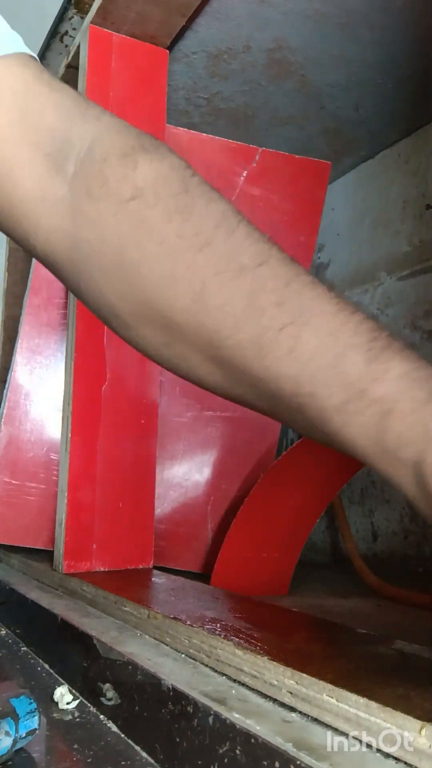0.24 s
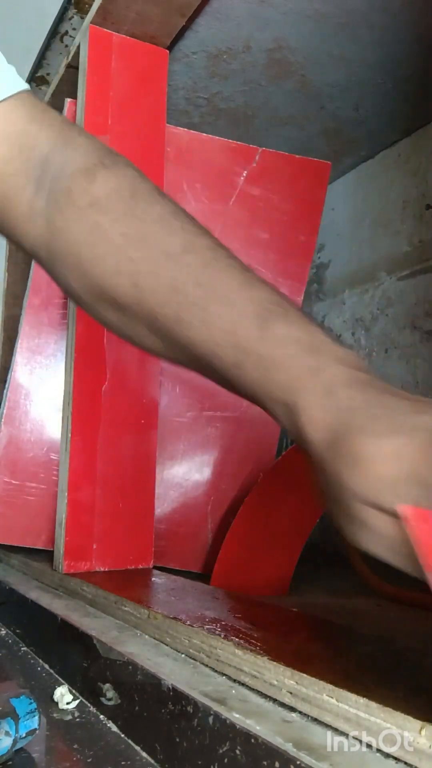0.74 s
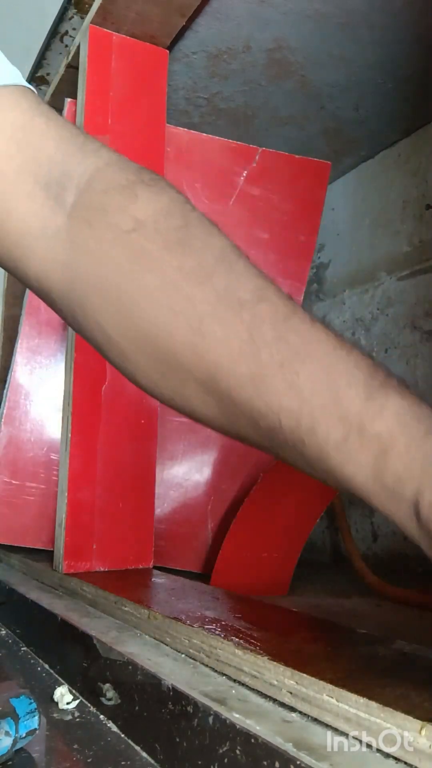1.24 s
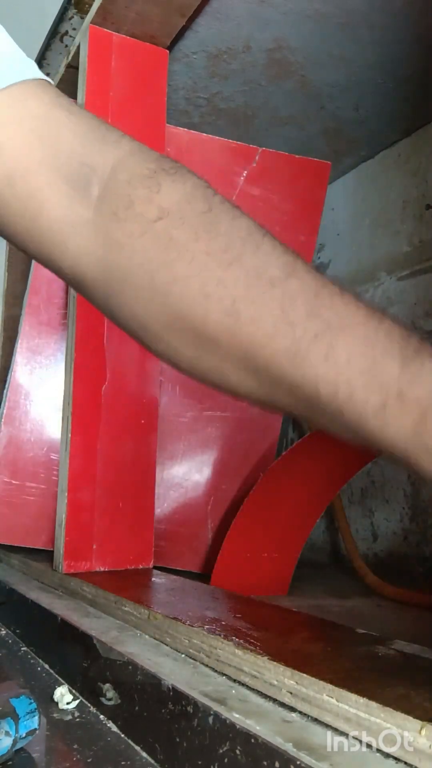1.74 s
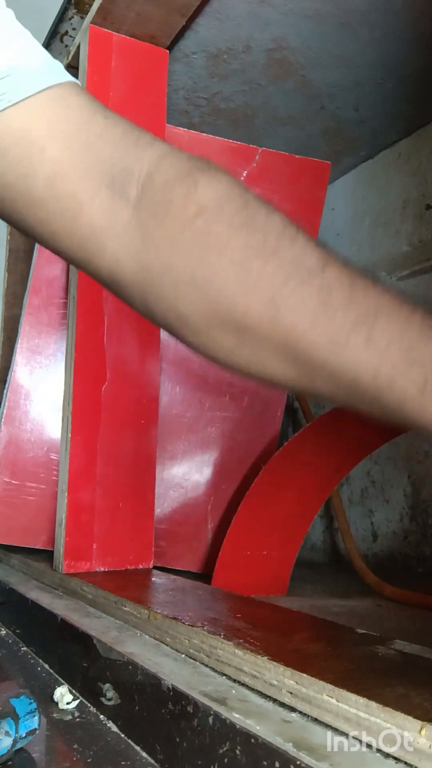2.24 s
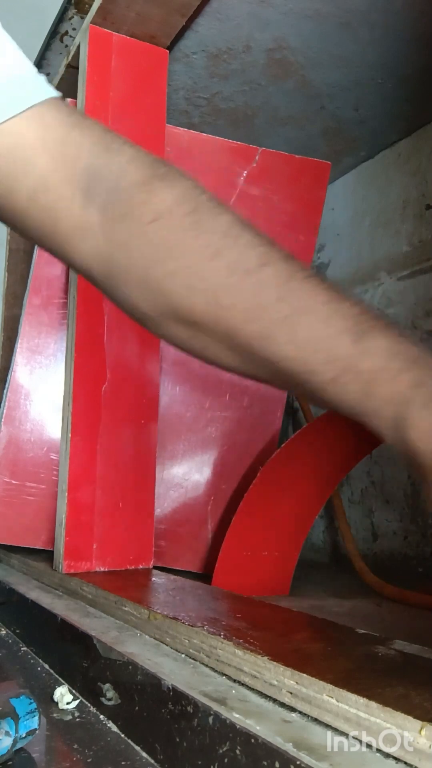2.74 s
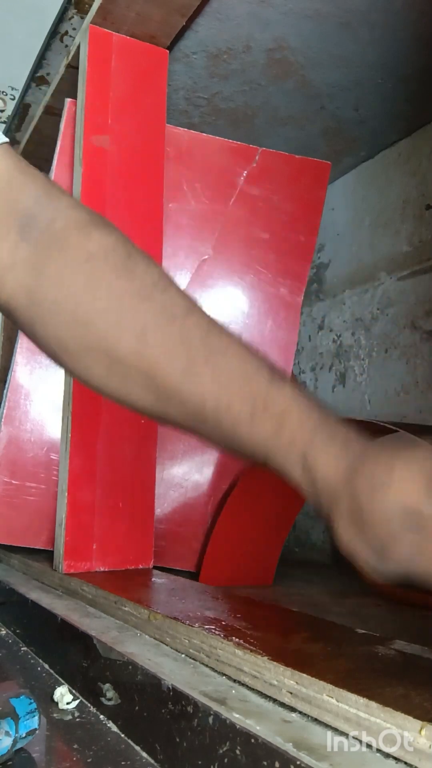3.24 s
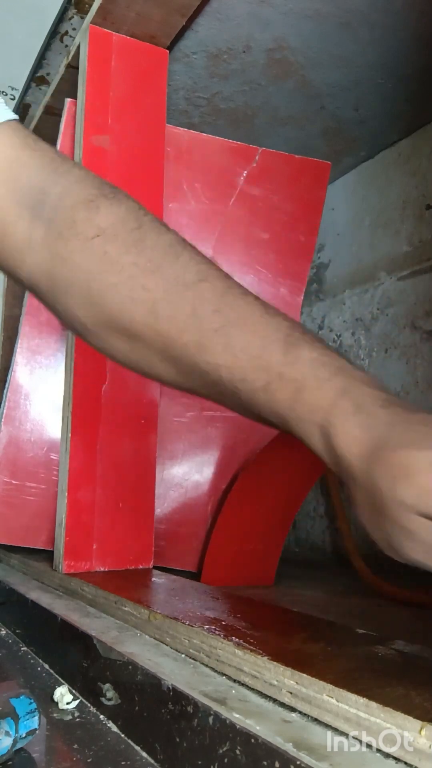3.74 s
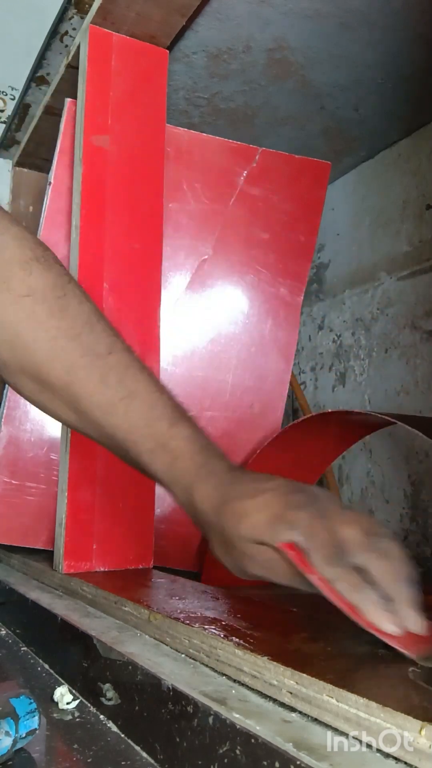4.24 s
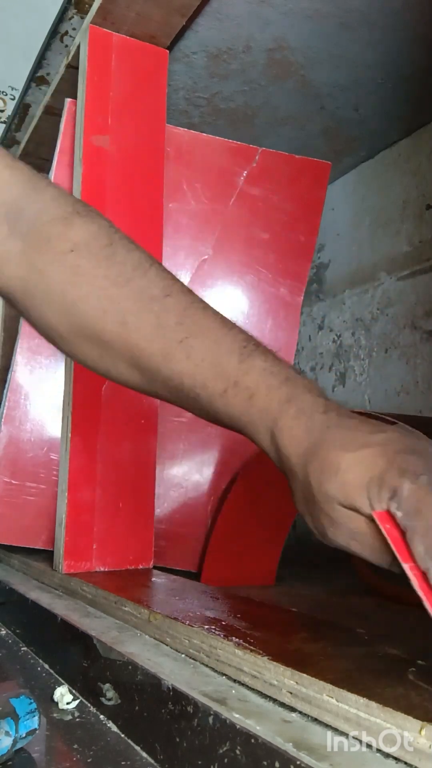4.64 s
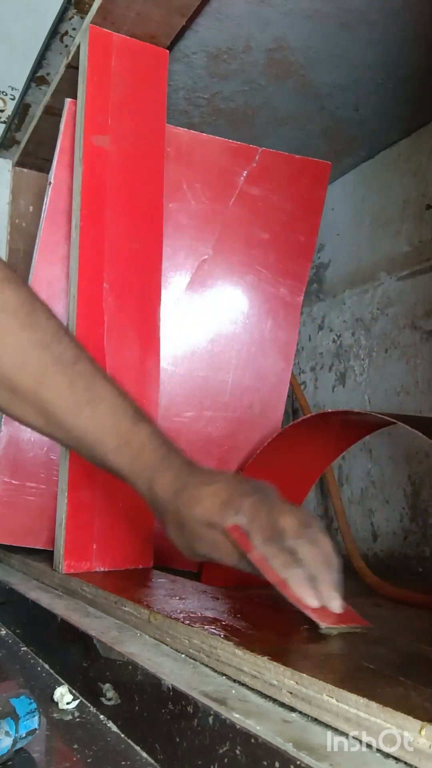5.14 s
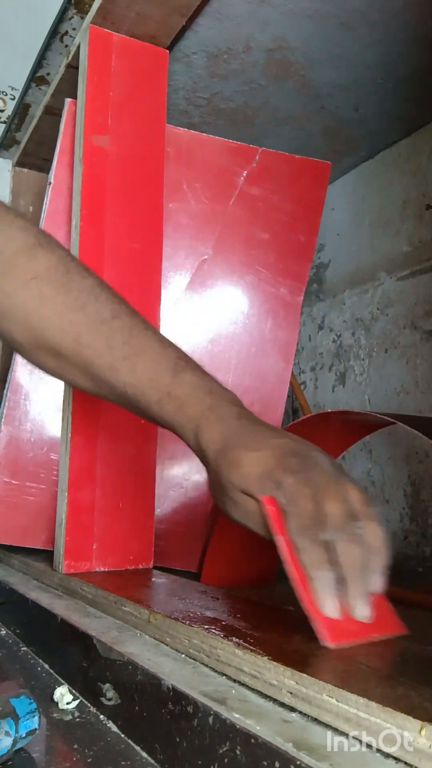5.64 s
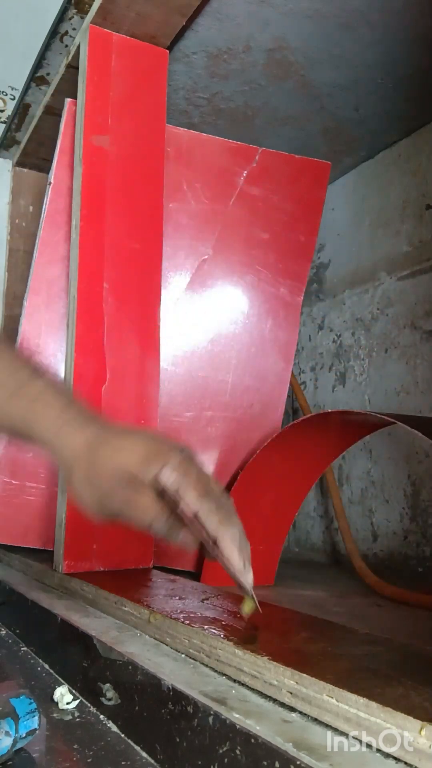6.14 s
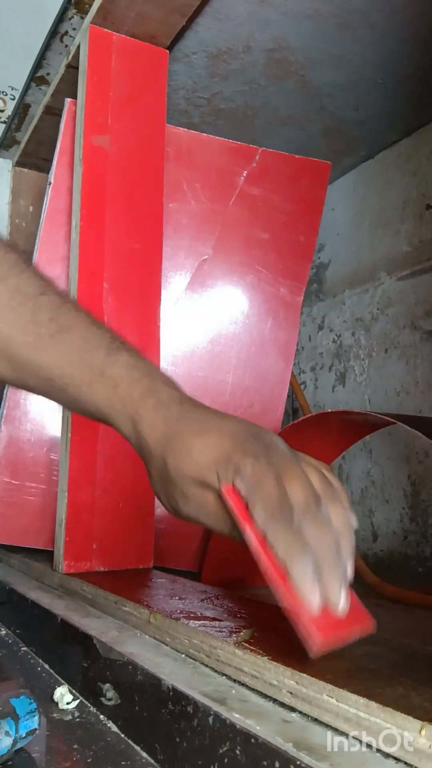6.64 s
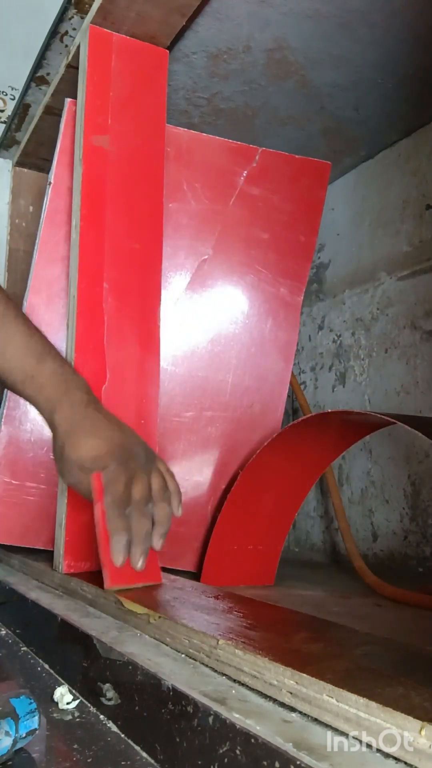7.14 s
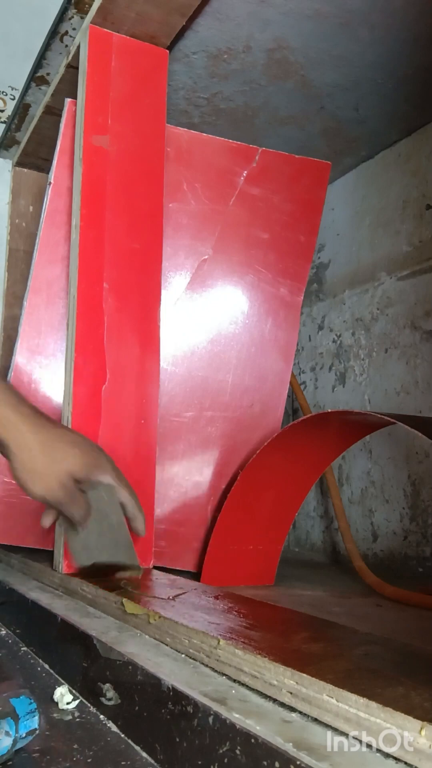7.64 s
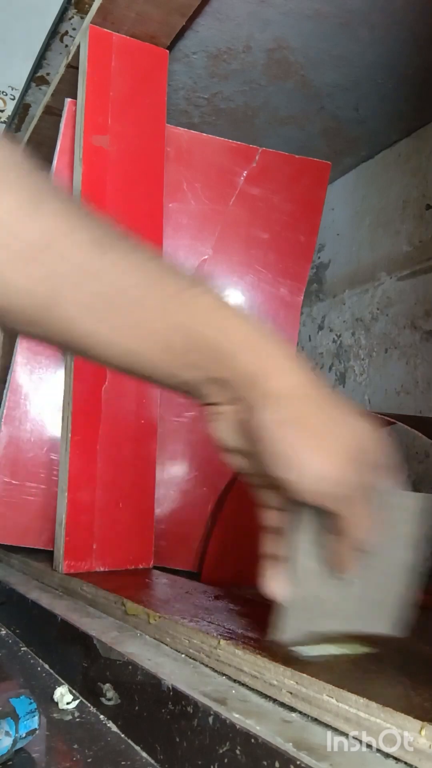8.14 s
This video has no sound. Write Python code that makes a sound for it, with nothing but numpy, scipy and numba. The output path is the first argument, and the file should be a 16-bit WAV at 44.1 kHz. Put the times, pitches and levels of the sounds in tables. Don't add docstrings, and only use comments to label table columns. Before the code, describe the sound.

Dry, raspy scraping swishes repeat roughly every half second on a wooden bench, with sharp taps and faint hollow knocks in a quiet workshop.

```python
import sys
import numpy as np
from scipy import signal
from scipy.fft import rfft, irfft
from scipy.io import wavfile
from scipy.ndimage import uniform_filter1d
from numba import njit

SR = 44100
rng = np.random.default_rng(int(sys.argv[2]) if len(sys.argv) > 2 else 0)


def wav_out(sig):
    wavfile.write(sys.argv[1], SR, np.round(np.clip(np.atleast_2d(sig).T, -1, 1) * 32767).astype(np.int16))


def makeup_ratio(level_db):
    decades = np.asarray(level_db, float) / 20
    return 10 ** decades


N = 369558
HAND_S = np.arange(0, N / SR + .002, .001)


def unit(x):
    return x / np.sqrt(np.mean(x ** 2))


def band(x, lo_hz, hi_hz, order=2):
    sos = signal.butter(order, [lo_hz, min(hi_hz, .45 * SR)], "band", fs=SR, output="sos")
    return signal.sosfilt(sos, x)


def colour(x, points, peaks=(), share=1):
    hz = np.arange(2049) * SR / 4096 + 1
    point_hz, point_db = np.array(points).T
    db = share * np.interp(np.log(hz), np.log(point_hz), point_db)
    db = db + sum(d / (1 + (2 * (hz - f) / w) ** 2) for f, w, d in peaks)
    cep = irfft(np.log(makeup_ratio(db)))
    cep[1:2048] *= 2
    cep[2049:] = 0
    response = irfft(np.exp(rfft(cep)))[:2048]
    return signal.fftconvolve(x, response)[:len(x)]


def ring(x, hz, t60):
    r = np.exp(-np.log(1000) / (max(t60, .003) * SR))
    w = 2 * np.pi * hz / SR
    return signal.lfilter([np.sin(w)], [1, -2 * r * np.cos(w), r * r], x)


def walk(rate):
    k = int(SR / rate)
    held = np.repeat(rng.standard_normal(N // k + 1), k)
    return uniform_filter1d(held, k)[:N]


@njit
def svf(x, hz, q):
    y, bp, lp = np.empty(len(x)), 0., 0.
    for i in range(len(x)):
        g = np.tan(np.pi * hz[i] / SR)
        v = (bp + g * (x[i] - lp)) / (1 + g * (g + 1 / q))
        bp, lp, y[i] = 2 * v - bp, lp + 2 * g * v, v / q
    return y


def audio_rate(*controls):
    return [np.interp(np.arange(N) / SR, HAND_S, c) for c in controls]


# (start [s], rise [s], hold [s], peak [dB], change over the hold [dB])
STROKES = [(-.06, 0.086, 0.033, -34.5, 1), (.295, 0.093, 0.066, -27, -1), (0.653, 0.13, 0.12, -29, 0),
           (1.366, 0.023, 0.051, -71, -3), (1.446, 0.058, 0.012, -44.5, 8), (1.801, 0.05, 0.016, -32, -1.5),
           (2.184, 0.095, 0.019, -36, -2.5), (2.353, 0.037, 0.098, -63, -2), (2.571, 0.22, 0.26, -32, -8),
           (2.953, 0.059, 0.13, -22, -6), (3.332, 0.15, .01, -37.5, -1), (3.752, 0.15, .16, -26.5, -9),
           (4.234, 0.067, 0.094, -38.5, 3.5), (4.702, .13, 0.13, -28.5, -4),
           (5.176, 0.12, 0.041, -30.5, 0.5), (5.638, .12, .24, -31.5, -7), (5.78, .1, .015, -27, -6.5),
           (6.295, .065, 0.056, -48, 4.5), (6.766, .04, 0.037, -68, 1), (6.838, .13, 0.19, -32, -5),
           (7.431, .06, 0.084, -38, -12.5), (7.775, 0.091, .19, -27.5, -9.5),
           (7.948, .18, 0.054, -22.5, -7), (8.166, 0.087, 0.18, -27, 2)]
# (flex re rasp [dB], hiss re rasp [dB], flex [Hz], rasp [Hz])
GRIP = [(-3.5, -6, 1175, 3700), (-5, -4.5, 1183, 2750), (-6, -5, 1215, 3300), (-7, -2, 1500, 2250),
        (-11, -8, 1230, 2500), (-5.5, -8.5, 1230, 3100), (-1, -12, 860, 2400), (4.5, -7.5, 860, 2000),
        (0.5, -8, 1074, 2600), (-3.5, -20, 990, 1600), (1.5, -10, 960, 2200), (-7.5, -7.5, 1094, 2800),
        (-5, -6.5, 1130, 2400), (-12, -9.5, 950, 1900), (-11, -10, 870, 1700), (-7, -7.5, 796, 2000),
        (-10.5, -9.5, 800, 3100), (-10.5, -3.5, 1050, 2400), (0, -4, 1150, 2200), (-8.5, -9.5, 1040, 2250),
        (-9, -7.5, 1080, 3100), (-4.5, -11, 886, 2500), (-9.5, -17.5, 910, 2250), (-8, -5, 1120, 2800)]
RELEASES = [380, 326.3, 270.6, 350, 402.3, 351, 250, 330, 267.4, 269, 325, 340, 352.4, 349, 345.4, 400,
            300.3, 504, 400, 322, 347, 300, 295, 300]
# (level re tap [dB], hiss re skid [dB])
SKIDS = [(-3, -9), (-11, -16), (-6.5, -15), (-7, -6), (-5.5, -18.5), (-9.5, 6), (-36, -12), (-15, -9),
         (-15, -18), (-7, -12), (-12, 5.5), (-5, -5), (-10.5, 9), (-9.5, -23.5), (-14, -3), (-8, -33),
         (-11, 7), (-7.5, 2), (-12.5, -12), (-8.5, -7.5), (-14, -5), (-13, -4), (-14, 1.5), (-5, -13)]
ONSET_DB = -26.5
LIFT_DB, LIFT_S = -3, 0.018
SKID_DB_PER_S, SKID_FLEX_DB = 449, -14
FLEX_GAIN_DB_PER_S, HISS_SAG_DB_PER_S, HISS_RELEASE_DB_PER_S = 2.5, 4.5, 152
FLEX_SAG_PER_S, RASP_SAG_PER_S = 0.52, 0.42


def hand():
    start, rise, hold, peak_db, fade_db = np.array(STROKES).T[:, :, None]
    age, hold = HAND_S - start, np.maximum(hold, .005)
    lifted = np.maximum(age - rise - hold, 0)
    db = peak_db + ONSET_DB * np.clip(1 - age / rise, 0, 1) ** 2
    db = db + fade_db * np.clip((age - rise) / hold, 0, 1)
    db = db - np.array(RELEASES)[:, None] * lifted
    db = db + LIFT_DB * np.minimum(lifted / LIFT_S, 1)
    db = np.where(age < 0, -130, db)
    now = db.argmax(axis=0), np.arange(len(HAND_S))
    flex_db, hiss_db, flex_hz, rasp_hz = np.array(GRIP)[now[0]].T
    along = np.clip(age - rise, -.2, .3)[now]

    since = HAND_S - np.array(TAPS)[:, :1]
    skid_db = np.array(TAPS)[:, 1:2] + np.array(SKIDS)[:, :1] - SKID_DB_PER_S * since
    skid_db = np.where(since < 0, -130, skid_db)
    skid_hiss_db = np.array(SKIDS)[skid_db.argmax(axis=0), 1]
    skid_db = skid_db.max(axis=0)
    skids = skid_db > db[now]

    flex_db = np.where(skids, SKID_FLEX_DB, flex_db + FLEX_GAIN_DB_PER_S * along)
    hiss_db = hiss_db - HISS_SAG_DB_PER_S * along - HISS_RELEASE_DB_PER_S * lifted[now]
    hiss_db = np.where(skids, skid_hiss_db, hiss_db)
    flex_hz = flex_hz * (1 - FLEX_SAG_PER_S * along)
    rasp_hz = rasp_hz * (1 - RASP_SAG_PER_S * along)
    grip = uniform_filter1d([flex_db, hiss_db, flex_hz, rasp_hz], size=5)
    return audio_rate(np.maximum(skid_db, db[now]), *grip)


GRIT_SPREAD_DB = 4.3


def grit(per_s, chatter_db):
    chance = rng.random((3, N))
    sizes = makeup_ratio(-GRIT_SPREAD_DB * np.log(chance[2] + 0.039))
    clicks = (chance[0] < per_s / SR) * np.sign(chance[1] - .5) * sizes
    chatter = np.clip(.15 * walk(45) + walk(600), -3, 2.5)
    return clicks * makeup_ratio(chatter_db * chatter)


# (frequency [Hz], level per Hz [dB])
RASP = [(180, -75), (300, -41), (449, -13), (627, -5.5), (877, -4), (954, -11.5), (1150, -4.5),
        (1270, -5.5), (1480, 2.5), (3190, 2), (4460, -9), (6340, -15), (12000, -33.5), (15200, -34),
        (16500, -35)]
# (frequency [Hz], width [Hz], level [dB])
BLADE = [(3704, 420, 5), (6050, 2200, 6.5)]
GRIT_PER_S, CHATTER_DB = 5000, 1.8


def rasp(rasp_db, flex_db, hiss_db, flex_hz, rasp_hz):
    blade = colour(grit(GRIT_PER_S, CHATTER_DB), RASP, BLADE)
    flex = band(blade, 300, 1400, order=3)
    mid = band(blade, 1400, 4500, order=3)
    hiss = band(blade, 4500, 17000, order=3)
    flex = svf(svf(flex, flex_hz, 1.6), flex_hz, 1.6) + .6 * svf(flex, flex_hz, 6.)
    mid = mid + 0.6 * svf(mid, rasp_hz, 3.6)
    flex = unit(flex) * makeup_ratio(flex_db + 0.51 * walk(60))
    hiss = unit(hiss) * makeup_ratio(hiss_db + 0.59 * walk(90))
    return makeup_ratio(rasp_db - 2.5) * (unit(mid) + flex + hiss)


ECHO_T60_S = 0.21
EARLY_T60_S, EARLY_DB = .009, 12


def panels(x, echo_db, travel_s):
    hop, t = int(travel_s * SR), np.arange(SR // 10) / SR
    steps = N // hop + 2
    fade = np.sin(np.pi * np.arange(2 * hop) / (2 * hop)) ** 2
    padded = np.r_[np.zeros(hop), x, np.zeros(3 * hop)]
    out = np.zeros(N + 4 * hop + SR)

    noise = rng.standard_normal((steps, len(t))) * (t > .0004)
    low = band(noise, 280, 1900)
    tails = low * makeup_ratio(-60 * t / ECHO_T60_S)
    tails = tails + 0.64 * (noise - low) * makeup_ratio(-60 * t / (0.89 * ECHO_T60_S))
    tails = tails + noise * makeup_ratio(EARLY_DB - 60 * t / EARLY_T60_S)
    tails = tails / np.linalg.norm(tails, axis=1, keepdims=True)

    pieces = np.array([padded[k * hop:(k + 2) * hop] * fade for k in range(steps)])
    for k, echo in enumerate(signal.fftconvolve(pieces, tails, axes=1)):
        out[k * hop:k * hop + len(echo)] += echo
    return x + makeup_ratio(echo_db) * out[hop:hop + N]


# (frequency [Hz], left minus right [dB])
PORTS = [(150, 0), (500, .5), (1290, 2), (2380, -5), (4400, -4.5), (8120, -1), (13000, -3), (14500, -10)]
# (frequency [Hz], width [Hz], level [dB])
PORT_WHISTLE = [(14600, 990, 1), (15350, 2300, 11)]


def ports(x, lag, echo_db, pan_db, travel_s):
    left, right = panels(x, echo_db, travel_s), panels(x, echo_db, travel_s)
    left = np.r_[np.zeros(lag), left[:-lag]]
    left = colour(left, PORTS, PORT_WHISTLE, share=.5)
    right = colour(right, PORTS, PORT_WHISTLE, share=-.5)
    return np.array([left * makeup_ratio(pan_db / 2), right * makeup_ratio(-pan_db / 2)])


# (frequency [Hz], level per Hz [dB])
HUSH = [(15, -44.5), (25, -10.5), (82, 0.5), (451, -12), (840, -11), (2000, -7.5), (3720, -18),
        (6740, -20.5), (8140, -30.5), (16000, -38.5)]
# (time [s], level [dB])
SUPPRESS = [(0, 2), (1.101, 3.5), (1.4, 2), (4.4, -1), (4.65, 0.5), (5.5, 0), (6.2, 1), (6.6, -4.5),
            (7.3, -2), (8.38, 0)]
HUSH_DB = -75.5


def hush():
    mid, side = (colour(rng.standard_normal(N), HUSH) * makeup_ratio(2.5 * walk(7.2)) for _ in range(2))
    level_db = HUSH_DB - 2 + np.interp(np.arange(N) / SR, *np.array(SUPPRESS).T)
    return makeup_ratio(level_db) * unit(np.array([mid + .5 * side, mid - .5 * side]))


# (time [s], hold [s], knocks [dB], lowest mode [dB], rumble [dB])
THUMPS = [(0.204, .34, -73, -79, -87), (0.612, 0.041, -67, -77, -88.5), (2.903, .05, -60.5, -75, -84),
          (1.642, 0.075, -70.5, -88, -79), (2.238, 0.15, -49.5, -54, -72), (2.541, 0.05, -52, -57.5, -76),
          (2.962, 0.23, -43.5, -40.5, -69.5), (3.434, 0.074, -46.5, -53.5, -71.5),
          (3.598, 0.16, -60.5, -65, -68.5), (4.04, 0.14, -79, -66, -83), (4.225, 0.13, -60, -75, -84.5),
          (4.69, 0.052, -71.5, -66.5, -82.5), (4.84, .2, -78, -74.5, -91), (5.2, .14, -72, -82.5, -88.5),
          (3.266, .16, -59.5, -64.5, -79), (5.618, .13, -73, -59.5, -78), (5.862, 0.045, -80, -78, -77),
          (6.161, .3, -95, -99, -77.5), (6.418, 0.022, -63, -88, -80.5), (6.738, .06, -72.5, -79, -76.5),
          (6.822, 0.26, -80.5, -94, -72), (7.418, 0.056, -56.5, -66.5, -76.5),
          (7.758, 0.071, -70, -78.5, -77.5), (8.143, .26, -67, -84, -95)]
# knocks, lowest mode, rumble (level [dB])
REST_DB = [-90.5, -95.5, -90]
THUMP_RISE_DB_PER_S, THUMP_SAG_DB_PER_S, THUMP_FALL_DB_PER_S = 900, 20, 221


def lean():
    start, hold, *levels = np.array(THUMPS).T[:, :, None]
    age = HAND_S - start
    shape = THUMP_RISE_DB_PER_S * np.minimum(age, 0)
    shape = shape - THUMP_SAG_DB_PER_S * np.clip(age, 0, hold)
    shape = shape - THUMP_FALL_DB_PER_S * np.maximum(age - hold, 0)
    return audio_rate(*[np.maximum((db + shape).max(axis=0), rest) for db, rest in zip(levels, REST_DB)])


# (frequency [Hz], level [dB], T60 [s])
HOLLOW = [(257.2, -6.5, 0.19), (305, 1.5, .08), (340, -0.5, 0.07), (384, 1, 0.057)]
# (frequency [Hz], level [dB], T60 [s])
BENCH = [(500.3, 8.5, 0.2), (578, 3, 0.087), (620, -0.5, 0.043), (744, 1, 0.23), (876, -9.5, .12),
         (995, -5, 0.13), (1190, 2, 0.28), (1350, 6.5, 0.053), (1590, 3.5, 0.055), (3080, 3.5, 0.025),
         (5270, -3.5, .03)]
HEAVY_DB = -48


def bench(knock_db, drone_db, rumble_db):
    knocks = unit(grit(900, 0.62))
    hollow = sum(makeup_ratio(db) * ring(knocks, hz, t60) for hz, db, t60 in HOLLOW)
    hollow = unit(band(hollow, 230, 370)) * makeup_ratio(knock_db + 5)
    heavy = knocks * makeup_ratio(knock_db + 1.5 * np.minimum(knock_db - HEAVY_DB, 0))
    upper = sum((-1) ** k * makeup_ratio(db) * ring(heavy, hz, t60) for k, (hz, db, t60) in enumerate(BENCH))
    drone = unit(band(ring(knocks, 164, 1.0), 120, 240)) * makeup_ratio(drone_db + 2.5 + 2.7 * walk(12))
    rumble = unit(band(rng.standard_normal(N), 63, 90)) * makeup_ratio(rumble_db + 1.5 + 3 * walk(7))
    return hollow + makeup_ratio(-19) * band(upper, 310, 8000), drone, rumble


# (time [s], peak [dB], ring [Hz], knock re peak [dB], knock [Hz])
TAPS = [(0.208, -35, 1560, -10.5, 852), (0.635, -24.5, 1500, -19.5, 1206), (1.28, -51, 2245, -27, 787),
        (1.715, -55, 1500, -16, 762), (2.072, -43, 3440, -26, 1264), (2.486, -43, 2010, -16, 1200),
        (2.541, -38, 1120, 2, 758), (2.98, -23, 1670, -5, 707), (3.066, -14, 1600, -26, 728),
        (3.322, -28, 2490, -18.5, 754), (3.735, -27.5, 2890, -30, 1230), (4.23, -36, 1550, -19, 890),
        (4.303, -26.5, 3770, -14.5, 1330), (4.678, -32.5, 2870, -23, 1170), (5.19, -37, 3770, -9.5, 765),
        (5.604, -32, 1540, -18, 867), (6.313, -43.5, 3990, -11, 1148), (6.358, -35, 3820, -33, 1170),
        (6.429, -33.5, 1620, -13.5, 776), (6.738, -41, 2970, -15, 1150), (6.807, -44.5, 2360, -22, 1190),
        (6.857, -27.5, 2430, -28.5, 996), (7.418, -21, 3484, -20.5, 939), (7.742, -39.5, 1840, -0.5, 638)]
KNOCK_T60_S = .11
THUD_DB, THUD_S = -1, 0.019


def taps():
    size = 8192
    out = np.zeros(N + size)
    t = np.arange(size) / SR
    for (s, db, hz, knock_db, knock_hz), noise in zip(TAPS, rng.standard_normal((len(TAPS), size))):
        push = noise * np.exp(-t / 0.00015)
        crack = colour(push, RASP, BLADE)
        tone = ring(push, hz, .042)
        knock = ring(noise * np.exp(-t / 0.0032), knock_hz, KNOCK_T60_S)
        thud = band(noise[::-1] * np.exp(-t / THUD_S), .6 * knock_hz, 1.9 * knock_hz)
        knock = knock / abs(knock).max() + makeup_ratio(THUD_DB) * thud / abs(thud).max()
        hit = crack / abs(crack).max() + .6 * tone / abs(tone).max()
        hit = hit + makeup_ratio(knock_db + 3.5) * knock
        first = int(s * SR)
        out[first:first + size] += makeup_ratio(db - 1.5) * hit
    return band(out[:N], 500, 17000, order=3)


# (time [s], left minus right [dB])
DRIFT = [
    (0, 1),
    (3, 2),
    (5.5, 2),
    (6.8, 0),
    (8.38, .5),
]
RASP_LAG, BENCH_LAG = 41, 53
ECHO_DB, TRAVEL_S = 4.5, .035


def scene():
    pan_db = np.interp(np.arange(N) / SR, *np.array(DRIFT).T)
    blade = ports(rasp(*hand()) + taps(), RASP_LAG, ECHO_DB, pan_db, TRAVEL_S)
    modes, drone, rumble = bench(*lean())
    lows = np.array([np.roll(drone, BENCH_LAG // 2) + rumble, drone + rumble])
    return blade + ports(modes, BENCH_LAG, -6, 2.6, 0.98) + lows + hush()


def low_pass(x):
    return signal.sosfilt(signal.butter(12, 17120, fs=SR, output="sos"), x)


def record(dry):
    top_cut = signal.ellip(9, .5, 30, 15850, fs=SR, output="sos")
    mix = signal.sosfilt(top_cut, dry)
    return low_pass(mix)


dry = scene()
out = record(dry)
wav_out(out)
```